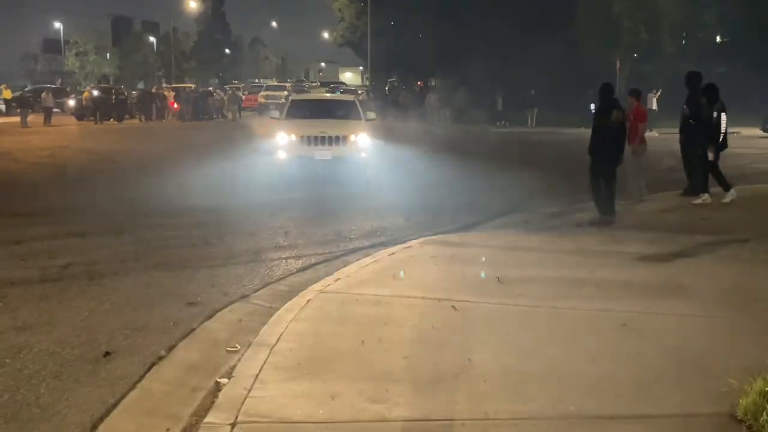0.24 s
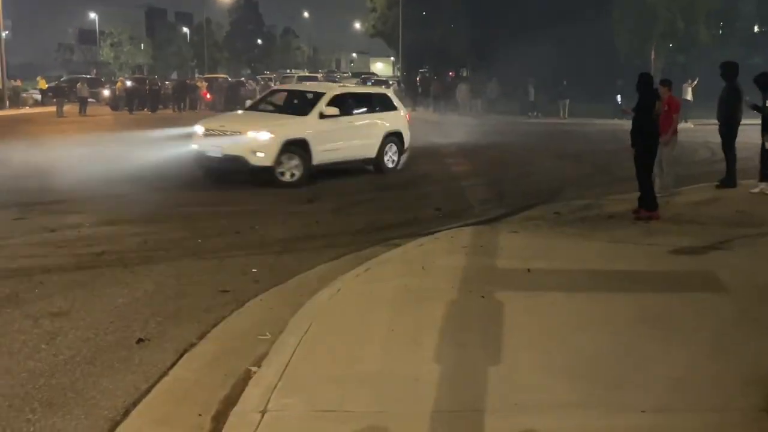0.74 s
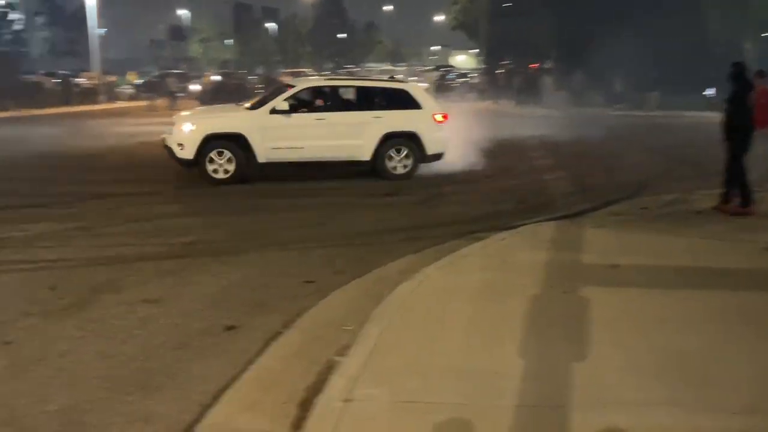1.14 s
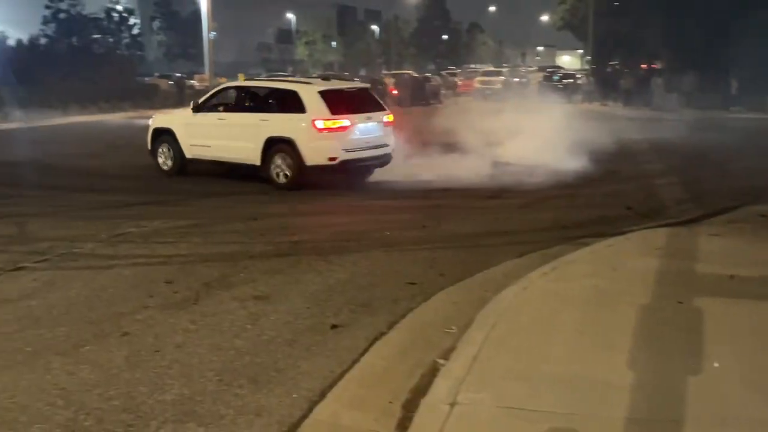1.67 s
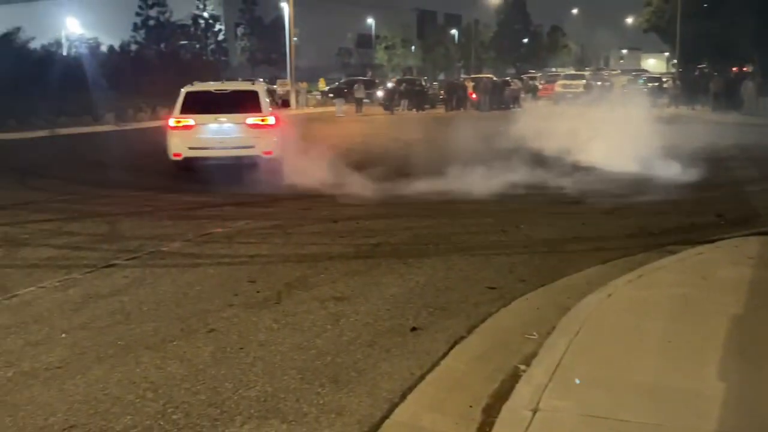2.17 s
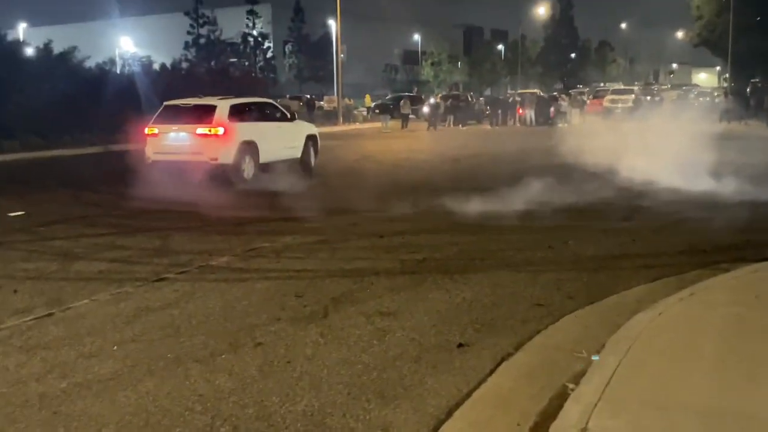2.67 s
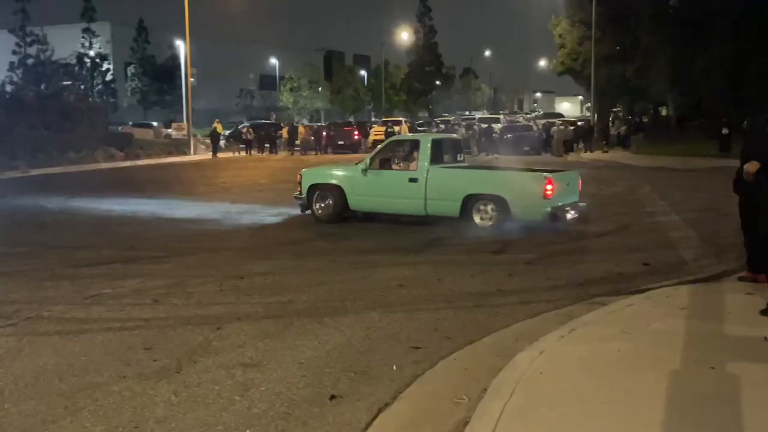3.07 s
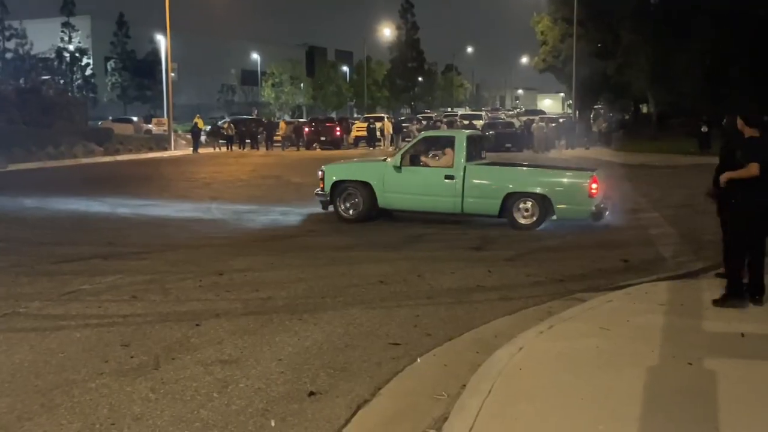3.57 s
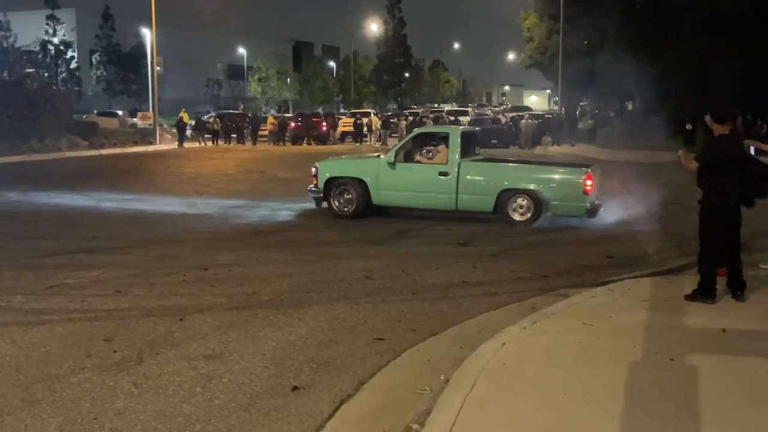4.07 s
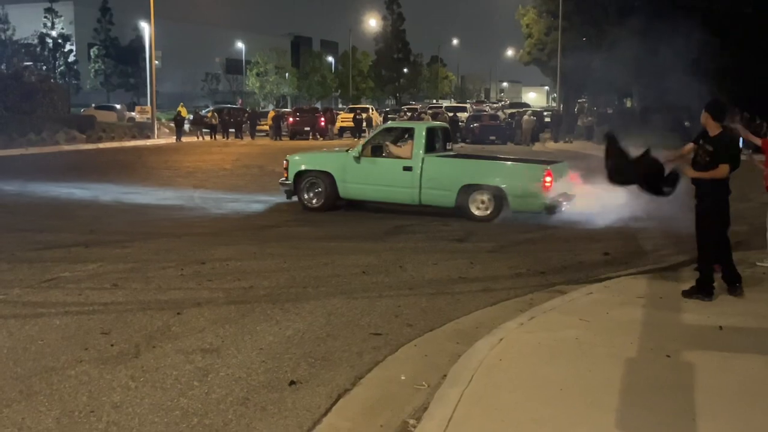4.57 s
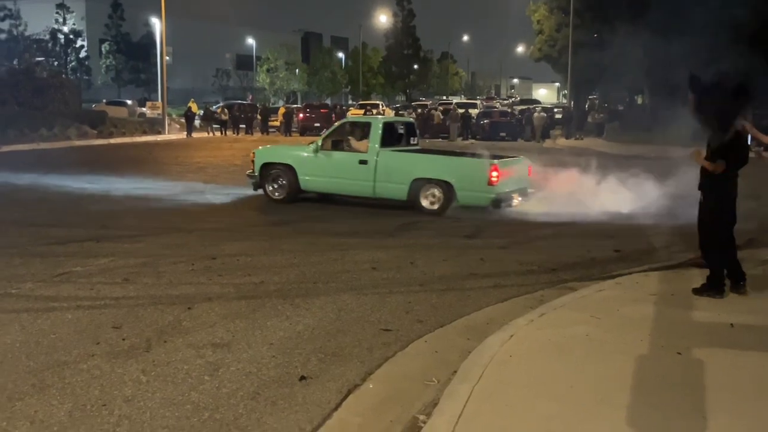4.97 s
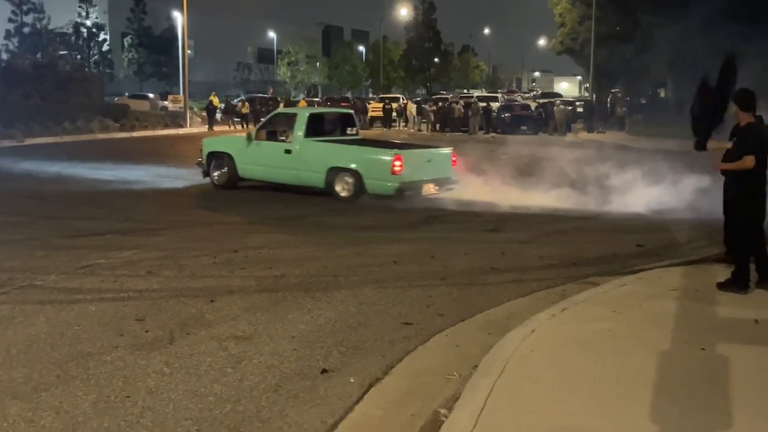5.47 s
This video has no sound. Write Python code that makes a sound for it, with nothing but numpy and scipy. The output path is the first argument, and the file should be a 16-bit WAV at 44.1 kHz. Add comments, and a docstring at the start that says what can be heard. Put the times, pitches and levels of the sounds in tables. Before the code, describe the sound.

In an open lot at night, skidding rubber shrieks and fades, then abruptly a throbbing V8 exhaust holds high revs with tyres howling.

```python
"""A wide parking lot at night, heard from a phone on the kerb, in two shots joined by a hard cut.
First an SUV swings through a donut: engine orders and dark noise under a bank of stick-slip squeals and torn rubber.
Then a V8 pickup holds high revs in a burnout: uneven exhaust orders and gas puffs throb under three howling tread modes.
Short tread squeaks, thin whistles and hissing grit ride on top; noise tails scatter the sound across the lot."""
import sys
import numpy as np
from scipy import signal
from scipy.fft import rfft, irfft
from scipy.io import wavfile
from scipy.ndimage import uniform_filter1d, map_coordinates

SR = 44100
rng = np.random.default_rng(int(sys.argv[2]) if len(sys.argv) > 2 else 0)


def put_to_file(sound):
    """Save the sound as 16-bit audio at rate SR, in the file named by the first command-line argument."""
    columns = np.atleast_2d(sound).T  # one column per channel
    safe = np.clip(columns, -1, 1)
    whole_steps = np.round(safe * 32767)
    wavfile.write(sys.argv[1], SR, whole_steps.astype(np.int16))


N = 252252
T = np.arange(N) / SR

# The SUV's sliding tyres. Each row: time in seconds, squeal pitch in Hz before a 4.5 % raise,
# level in dB before a 1 dB cut, scatter of the tread pitches as log pitch ratio.
SUV_TYRES = [(0, 1044, -33, 0.16), (.72, 953.6, -40, .15), (1.0, 955.4, -26, .14),
             (1.2, 760.4, -40.5, 0.27), (1.52, 921.5, -22.5, 0.29), (1.69, 949, -14.5, .26),
             (1.8, 996, -17.5, 0.25), (1.9, 1015, -14, .27), (1.94, 1029, -20.5, 0.26),
             (2.15, 1023, -21.5, .26), (2.45, 987.3, -27.5, 0.29), (2.475, 1003, -35, 0.26),
             (2.51, 1045, -25.5, .22), (2.64, 1137, -27, 0.25), (2.7, 1145, -34, 0.25),
             (2.73, 1175, -26.5, 0.22), (2.93, 1095, -31, 0.28), (3.09, 1070, -29.5, .27)]
# The pickup's three howling tread modes. Each row: time in seconds, low pitch in Hz, low level in dB,
# middle pitch in Hz, middle level in dB, upper pitch in Hz, upper level in dB.
PICKUP_TYRES = [(3.5, 655.8, -24.5, 889, -25.5, 1290, -30), (3.7, 665.5, -30, 875.6, -25, 1295, -32),
                (3.9, 659.6, -31, 880, -34, 1280, -36.5), (4.1, 666, -27, 870.6, -24.5, 1298, -32.5),
                (4.48, 672.7, -23.5, 860.3, -26, 1280, -32), (4.8, 699, -28, 872.3, -26, 1275, -31.5),
                (5.15, 721, -30.5, 880, -24, 1286, -30.5), (5.3, 719, -31, 902, -26.5, 1310, -33),
                (5.7, 716, -31, 951, -26.5, 1358, -33)]
# The firm note the pickup's tread settles on as it creeps off. Each row: time in seconds, pitch in Hz, level in dB.
PICKUP_NOTE = [(5.0, 870, -55), (5.1, 890, -28), (5.16, 905, -29), (5.24, 880, -40), (5.32, 868, -25),
               (5.38, 865, -34), (5.47, 890, -27), (5.51, 945, -23), (5.56, 968, -23), (5.61, 958, -24),
               (5.7, 985, -28)]
# The pickup's revs. Each row: time in seconds, engine cycles per second.
PICKUP_REVS = [(3.12, 31), (3.37, 31.5), (3.45, 28.8), (3.78, 28.85), (3.9, 29.7), (4.5, 31.45),
               (5.05, 31.55), (5.72, 29.8)]
# Exhaust lines. Each row: multiple of the engine cycle rate, relative level in dB.
SUV_ORDERS = [(3, -4.5), (4, 1), (6, -3.5), (7, -5), (9, -10.5), (10, -22)]
PICKUP_ORDERS = [(2, -12), (3, -6.5), (4, -12), (5, 0), (6, -10), (7, -17), (8, -22)]
PICKUP_BARK = [(10, 1), (11, 3), (12, 2), (13, 5), (14, 0.5), (15, 1), (16, 1), (17, 1), (18, -2)]  # higher lines that stand out of the rasp
# Short notes as the tread catches. Each row: start in seconds, length in seconds, start pitch in Hz,
# end pitch in Hz, level in dB, roughness as share of the pitch.
SQUEAKS = [(.05, .08, 1030, 1060, -35, .03), (.04, .07, 1400, 1560, -38, .04),
           (.11, .08, 1260, 1170, -37, .035), (.1, .07, 2080, 2000, -42, .025),
           (.41, .1, 1500, 1380, -39, .035), (.43, .08, 2000, 1900, -42, .03),
           (.61, .07, 2620, 2740, -44, .014), (.72, .1, 2020, 1850, -39, .018),
           (.8, .07, 1480, 1430, -36, .015), (.84, .06, 1010, 950, -32, .02),
           (.95, .11, 965, 945, -28, .016), (.95, .05, 1820, 1880, -41, .015),
           (1.0, .07, 780, 750, -33, .03), (1.24, .012, 740, 720, -23, .014),
           (1.6, .07, 2230, 2400, -35, .008), (1.65, .07, 2230, 2370, -33, .008),
           (1.67, .06, 2070, 2100, -36, .014), (1.67, .07, 870, 830, -18, .02),
           (1.74, .06, 1040, 990, -20, .014), (1.875, .045, 1050, 1010, -15, .014),
           (2.11, .09, 870, 825, -27, .02), (2.125, .04, 1800, 1880, -39, .06),
           (2.19, .15, 815, 830, -29, .02), (2.35, .12, 825, 850, -25, .014),
           (2.714, .007, 1200, 1190, -21, .014), (2.735, .05, 1170, 1230, -28, .014),
           (3.14, .17, 1205, 1240, -42, .008), (3.18, .14, 590, 630, -40, .03),
           (3.2, .07, 870, 890, -41, .015), (3.23, .07, 1470, 1510, -44, .012),
           (3.3, .1, 915, 935, -33, .014), (3.46, .06, 890, 915, -25, .014),
           (3.5, .07, 1235, 1260, -30, .012), (3.66, .11, 905, 850, -28, .016),
           (4.03, .08, 620, 665, -26, .02), (4.41, .07, 670, 640, -26, .02),
           (4.67, .07, 710, 680, -27, .02), (4.71, .08, 1220, 1280, -32, .01),
           (5.38, .05, 980, 1040, -29, .02)]
# A tyre bites into the asphalt, tearing rubber and throwing grit. Each row: peak in seconds,
# half length in seconds (where the bump is down to 1/e), scrub rise in dB, spray rise in dB.
BITES = [(0.06, 0.082, 6.5, 0), (0.247, 0.051, 2.5, -5), (0.468, 0.068, 3, -2), (0.63, 0.02, 1.5, 3),
         (0.812, 0.13, 6, 8), (1.007, 0.031, 3, 11.5), (1.62, 0.24, 9.5, 9.5), (1.705, .025, 2.5, -0.5),
         (1.913, 0.081, 7, 5.5), (2.145, 0.017, 5, -3), (2.293, 0.023, 4, -7), (2.385, 0.031, 7, -3),
         (2.894, 0.21, 3, 6.5), (3.451, 0.014, 4.5, 7.5), (3.834, 0.014, 4, 5), (3.97, 0.03, 3.5, 2),
         (4.35, 0.19, 1, 2.5)]
# Noise colours. Each row: frequency in Hz, relative density in dB.
SUV_BOOM = [(18, -78), (30, -27), (51, -14), (75, -2), (94, -9), (113, -7), (141, -8), (260, -13),
            (340, -72), (570, -120)]
SUV_RASP = [(150, -10.5), (230, -4.5), (290, -3), (335, -7.5), (410, -1.5), (500, -3), (620, 0.5),
            (760, -3.5), (1100, -6)]
PICKUP_RASP = [(140, 9), (220, -2.5), (295, -3.5), (340, -2), (400, 0), (450, -8.5), (490, -4.5),
               (560, -15), (800, -16), (1400, -8)]
SUV_SCRUB = [(450, -11), (750, -6.5), (1450, 3.5), (1730, 0.5), (2000, 2), (2300, -3), (2650, 1),
             (3000, -4.5), (3800, -8), (4450, -6), (4900, -10.5), (5600, -14), (8000, -19)]
PICKUP_SCRUB = [(490, -2.5), (600, 10.5), (900, 7.5), (1080, 3.5), (1350, -1.5), (1650, 4), (2000, -0.5),
                (2600, -3), (3200, -5), (3700, -10), (4500, -11), (5600, -14), (8000, -23)]
SPRAY = [(3400, -12), (4400, -1), (5400, 4.5), (7200, 4.5), (8700, 2.5), (10500, 1), (12000, -4),
         (13400, -17)]
# How the two microphone ports differ, and what is added to that for a vehicle's position.
# Each row: frequency in Hz, left minus right in dB, lead of the left in radians.
PORTS = [(100, 0, -.2), (400, 0, -.4), (540, 1, .7), (720, 1, -.1), (780, -2, 0), (820, -7, .5),
         (900, 0, .5), (1100, .3, .15), (1600, -3.5, -.1), (1750, -13, .2), (1820, -7, .9), (2100, 2, .6),
         (2500, 5.5, 1.3), (3200, 4.4, .9), (3600, 3, .1), (4500, .7, 0), (6000, .5, -.1), (7000, .5, -1.5),
         (9800, 0, -4.8), (10600, 0, -2 * np.pi)]
SUV_REAR = [(760, 0, 0), (900, 2.5, .3), (1080, 0, 0), (1400, -1, 1), (1560, 2, 1.8), (1660, 2, 5),
            (1800, 2, 2 * np.pi)]  # facing away
PICKUP_SIDE_ON = [(15, 0, 0), (50, 0, -1.4), (150, 0, -1.8), (350, 0, -2.4), (460, 0, -3.4),
                  (540, 1.5, -5.6), (660, 1.5, -6.2), (900, -2, -6.3), (1400, -1.5, -6.6),
                  (2100, 0, -2 * np.pi)]
PICKUP_SWUNG = [(15, 0, 0), (50, 0, -1.4), (150, 0, -1.5), (250, 1, -1.1), (350, 3, -.4), (450, 1.5, .3),
                (600, 0, 0), (900, -2, 0), (1700, -3, -.2), (2100, 0, 0)]  # tail swung round

CUT_S, RESUME_S = 3.1, 3.109
TOP_HZ = 13400

# SUV: engine cycles a second, and the share by which they wander
SUV_CYCLE_HZ, SUV_WANDER = 22.98, 0.0315
SUV_BOOM_DB, SUV_RASP_DB, SUV_SCRUB_DB, SUV_SPRAY_DB = -26, -36.5, -38.5, -52
SUV_RUMBLE_DB = -42.5  # the deepest rumble bends round the body and is never shaded
# its tail sweeps past the phone, then its body turns away and shades the boom; the grit is hidden last
TAIL_NEAREST_S, TAIL_PASS_S, TAIL_RASP_DB = 1.623, 0.63, 13.5
TURN_AWAY_S, TURN_LENGTH_S, SHADE_BOOM_DB = 1.81, 0.15, -7.5
SHADE_SPRAY_S, SHADE_SPRAY_LENGTH_S, SHADE_SPRAY_DB = 1.99, 0.064, -7.5
REAR_RASP_DB = 2  # more rasp once the tail points at the phone
DRONE_S, DRONE_LENGTH_S, DRONE_HZ, DRONE_DB = 2.76, 0.45, 417, -37  # the tailpipe drones at the phone
LIFT_OFF_S, LIFT_OFF_DB_PER_S = 2.853, -88  # the driver lets go of the throttle
# whistles against the scrub, and dB more for each dB of bite
CHIRP_DB, CHIRP_PER_BITE = -10.5, 0.091
# a close reflection grows as the SUV swings round, cancelling a rising pitch and its odd multiples
BOUNCE_S, BOUNCE_GROW_S = 1.03, 0.87
BOUNCE_FROM_HZ, BOUNCE_TO_HZ, BOUNCE_FROM_DB, BOUNCE_TO_DB = 400, 525, -16, -1.6

# pickup: it takes load, its tyres spin up, then it creeps away
LOAD_S, LOAD_LENGTH_S, SPIN_UP_S = 3.225, 0.023, 0.21
PICKUP_BOOM_DB, PICKUP_RASP_DB, PICKUP_SCRUB_DB, PICKUP_SPRAY_DB = -20, -27, -27.5, -48
GRIP_SQUEAL_DB, GRIP_GROUND_DB, GRIP_RASP_DB = -29.5, -14.5, -7  # howl, scrub and spray, rasp before the spin
CREEP_SCRUB_DB_PER_S, CREEP_SPRAY_DB_PER_S = -1.38, -1.5
# its tailpipe swings towards the phone: the rasp eases a little and the boom swells
SWING_S, SWING_LENGTH_S, SWING_RASP_DB, SWING_BOOM_DB_PER_S2 = 4.183, 0.66, -1.5, 2.5
# its pipe resonates when the third order meets it; that order is strongest with no load
PIPE_HZ, PIPE_WIDTH_HZ, PIPE_DB, OFF_PIPE_DB, UNLOADED_DB = 95.4, 3.5, 7.5, -5, 11.5
THROB_DB = 0.5  # the strongest exhaust order shakes the howl
OVERTONE_HZ, OVERTONE_DB, OVERTONE_S, OVERTONE_RISE_S = 1393, -37, 5.33, 0.1  # joins the firm note

# a tread block catches: how often, how much louder, share by which its pitch shifts; the whole tyre judders
CATCHES_PER_S, CATCH_DB, PITCH_WANDER = 40, 4.5, 0.035
JUDDERS_PER_S, JUDDER_DB = 150, 0.5


def suv():
    """The donut: engine and tyres with their close reflection, turning away, plus grit and the lot's tail."""
    away = ramp(TURN_AWAY_S, TURN_LENGTH_S)
    sound = bounce(suv_engine(away) + suv_tyres(), ramp(BOUNCE_S, BOUNCE_GROW_S))
    throw_db = bites()[1]
    spray_db = SUV_SPRAY_DB + throw_db + SHADE_SPRAY_DB * ramp(SHADE_SPRAY_S, SHADE_SPRAY_LENGTH_S)
    grit = undb(spray_db) * spray(grain_db=1.5, flutter_db=2.5)
    placed = (1 - away) * sound + away * ports(sound, SUV_REAR)
    return placed + grit + undb(-18) * lot(sound, t60=0.94, delay=0.013, side_db=2.5)


def suv_tyres():
    """Sliding rear tyres: many stick-slip pitches, torn rubber and thin whistles."""
    hz, squeal_db, spread = curves(SUV_TYRES)
    tear_db = bites()[0]
    scrub_db = SUV_SCRUB_DB + tear_db
    chirp_db = scrub_db + CHIRP_DB + CHIRP_PER_BITE * tear_db
    tyres = undb(squeal_db - 1) * squeal(hz * 1.045, spread, jitter=0.02406, flicker_db=3, octave_db=-22, count=14)
    tyres += undb(scrub_db) * scrub(SUV_SCRUB, grain_db=1.5, flutter_db=1.54)
    return tyres + undb(chirp_db) * chirps(hz=2050, spread=0.27, glide=0.06, flicker_db=8, count=9)


def suv_engine(away):
    """A muffled, unsteady engine: wandering exhaust lines in dark noise, with rasp, rumble and a tailpipe drone."""
    lifted_db = LIFT_OFF_DB_PER_S * np.maximum(T - LIFT_OFF_S, 0)
    boom_db = SUV_BOOM_DB + SHADE_BOOM_DB * away + lifted_db
    rasp_db = SUV_RASP_DB + TAIL_RASP_DB * bell(T, TAIL_NEAREST_S, TAIL_PASS_S) + REAR_RASP_DB * away
    turns = np.cumsum(SUV_CYCLE_HZ * (1 + SUV_WANDER * walk(18))) / SR
    lines = unit(sum(exhaust(turns, SUV_ORDERS, waver_db=4)))
    boom = undb(-4) * lines + undb(-5.5) * colour(noise(), SUV_BOOM)
    rumble = colour(noise(), [(32, -11), (48, -4), (62, -2.5)])
    drone = colour(noise(), [(DRONE_HZ * 0.75, -18), (DRONE_HZ, 0), (DRONE_HZ * 1.3, -22)])
    engine = undb(boom_db) * boom + undb(rasp_db) * colour(noise(), SUV_RASP)
    engine += undb(SUV_RUMBLE_DB + lifted_db) * rumble
    return engine + undb(DRONE_DB) * bell(T, DRONE_S, DRONE_LENGTH_S) * drone


def pickup():
    """The burnout: a V8 throbs through its swinging tailpipe while the spinning tyres howl and throw grit."""
    unloaded, gripping = 1 - ramp(LOAD_S, LOAD_LENGTH_S), 1 - ramp(LOAD_S, SPIN_UP_S)
    swung = ramp(SWING_S, SWING_LENGTH_S)
    turns = np.cumsum(curves(PICKUP_REVS)[0] * (1 + 0.0025 * walk(25))) / SR
    engine = pickup_engine(turns, unloaded, gripping, swung)
    tyres = pickup_tyres(turns, gripping, swung)
    sound = engine * np.clip((T[-1] - T) * 150, 0, 1) + tyres  # the engine fades in the last 7 ms
    throw_db = bites()[1]
    spray_db = PICKUP_SPRAY_DB + throw_db + GRIP_GROUND_DB * gripping + CREEP_SPRAY_DB_PER_S * (T - LOAD_S)
    grit = undb(spray_db) * spray(grain_db=1.5, flutter_db=2.5)
    placed = (1 - swung) * ports(sound, PICKUP_SIDE_ON) + swung * ports(sound, PICKUP_SWUNG)
    return placed + grit + undb(-23.5) * lot(tyres, t60=0.55, delay=0.016, side_db=0.5)


def pickup_tyres(turns, gripping, swung):
    """Spinning rear tyres: a howl, torn rubber, whistles, and a hiss as the tread turns towards the phone."""
    tear_db = bites()[0]
    scrub_db = PICKUP_SCRUB_DB + tear_db + GRIP_GROUND_DB * gripping + CREEP_SCRUB_DB_PER_S * (T - LOAD_S)
    tyres = undb(GRIP_SQUEAL_DB * gripping) * howl(turns)
    tyres += undb(scrub_db) * scrub(PICKUP_SCRUB, grain_db=0.5, flutter_db=0.6)
    tyres += undb(scrub_db - 15) * chirps(hz=2007, spread=0.3, glide=0.03, flicker_db=19)
    hiss = scrub([(3300, -11), (4300, 8), (5500, -10)], grain_db=3.5, flutter_db=1.5)
    return tyres + undb(-49.5) * swung * hiss


def pickup_engine(turns, unloaded, gripping, swung):
    """V8 exhaust: low orders boom through a resonant pipe, gas puffs rasp and high orders bark."""
    swell_db = SWING_BOOM_DB_PER_S2 * np.maximum(T - SWING_S, 0) ** 2
    boom_db = PICKUP_BOOM_DB + swell_db - 4 * (gripping - unloaded)  # the engine bogs as it takes the load
    rasp_db = PICKUP_RASP_DB + GRIP_RASP_DB * gripping + SWING_RASP_DB * swung
    bark_db = rasp_db - 5 + 0.57 * (rasp_db + 31)  # the bark rises and falls more than the rasp
    lines = exhaust(turns, PICKUP_ORDERS, waver_db=1.1, disorder=0.5)
    # the deepest order needs load; it spreads evenly all round and is kept out of the swell
    lines[0] = lines[0] * undb(-swell_db) * (1 - unloaded)
    third_hz = PICKUP_ORDERS[1][0] * curves(PICKUP_REVS)[0]
    lines[1] = lines[1] * undb(OFF_PIPE_DB + PIPE_DB * bell(third_hz, PIPE_HZ, PIPE_WIDTH_HZ) + UNLOADED_DB * unloaded)
    boom = sum(lines) / np.sqrt(uniform_filter1d(sum(lines) ** 2, size=3000))  # hold the sum at an even level
    breath = colour(noise(), [(30, -15), (48, 1), (70, 8), (110, 6), (155, 11), (240, 4)])
    boom += undb(-12 - swell_db / 2) * breath
    rasp = colour(firings(turns, scatter_db=1.5, puff=0.3) * noise(), PICKUP_RASP)
    bark = unit(sum(exhaust(turns, PICKUP_BARK, waver_db=4.5)))
    return undb(boom_db) * boom + undb(rasp_db) * rasp + undb(bark_db) * bark


def squeal(hz, spread, jitter, flicker_db, octave_db, count=9):
    """Tread blocks stick and slip, each near its own pitch; they take turns to catch and blend into one rough howl."""
    out, power = 0, 0
    for place in np.linspace(-1, 1, count):
        pitch = hz * np.exp(spread * place + PITCH_WANDER * walk(CATCHES_PER_S) + jitter * walk(260))
        phase = 2 * np.pi * (np.cumsum(pitch) / SR + rng.random())
        grip = undb(CATCH_DB * np.tanh(walk(CATCHES_PER_S)) - 4 * place ** 2)
        tone = np.sin(phase) + undb(octave_db) * np.sin(2 * phase)
        out = out + grip * undb(flicker_db * walk(90)) * tone
        power = power + grip ** 2
    return unit(out / np.sqrt(power) * undb(JUDDER_DB * walk(JUDDERS_PER_S)))


def howl(turns):
    """The pickup's tread: three rough modes shaken by the engine, plus a firm note and the upper mode's overtone."""
    low_hz, low_db, middle_hz, middle_db, upper_hz, upper_db = curves(PICKUP_TYRES)
    modes = undb(low_db) * squeal(low_hz, 0.11, jitter=0.02996, flicker_db=3.5, octave_db=-28, count=8)
    modes += undb(middle_db) * squeal(middle_hz, 0.105, jitter=0.025, flicker_db=1.5, octave_db=-30, count=8)
    modes += undb(upper_db) * squeal(upper_hz, 0.082, jitter=0.025, flicker_db=3.5, octave_db=-17.5, count=7)
    throb = undb(THROB_DB * np.sin(2 * np.pi * PICKUP_ORDERS[3][0] * turns))
    note_hz, note_db = curves(PICKUP_NOTE)
    firm = undb(note_db) * note(note_hz, jitter=0.008, flutter_db=1.5)
    overtone = ramp(OVERTONE_S, OVERTONE_RISE_S) * note(OVERTONE_HZ, jitter=0.009, flutter_db=2)
    return modes * throb + firm + undb(OVERTONE_DB) * overtone


def note(hz, jitter, flutter_db):
    """The whole tread slips in step: one slightly unsteady tone; rms 1."""
    phase = 2 * np.pi * np.cumsum(hz * (1 + jitter * walk(120))) / SR
    return unit(np.sin(phase) * undb(flutter_db * walk(90)))


def exhaust(turns, orders, waver_db, disorder=1):
    """Uneven firings sound as lines on multiples of the engine cycle; little disorder joins them in one throb a cycle."""
    lines = []
    for k, db in orders:
        phase = 2 * np.pi * (round(k) * turns + disorder * rng.random())
        lines.append(undb(db + waver_db * walk(15)) * np.sin(phase))
    return lines


def firings(turns, scatter_db, puff):
    """Gas leaves in eight puffs a cycle; the cylinders differ, and so does every firing."""
    count = (8 * turns).astype(int)
    cylinder_db = np.array([-1, -14, -2.5, 4.5, -13, 0.5, -2, -20])[count % 8]
    size = undb(cylinder_db + scatter_db * rng.standard_normal(4096)[count])
    return size * np.exp(-(8 * turns % 1) / puff)


def scrub(table, grain_db, flutter_db):
    """Rubber tears over the stones in dense grains that come in flurries."""
    grains = noise() * undb(grain_db * walk(1200))
    return colour(grains, table) * undb(flutter_db * walk(35))


def chirps(hz, spread, glide, flicker_db, count=6):
    """Tread edges catch for a moment and whistle in thin gliding strands."""
    out = 0
    for place in np.linspace(-1, 1, count):
        pitch = hz * np.exp(spread * place + glide * walk(16))
        strand = np.sin(2 * np.pi * np.cumsum(pitch) / SR)
        out = out + undb(flicker_db * np.tanh(walk(18))) * strand
    return unit(out)


def squeaks(flutter_db):
    """The tread catches in short notes, clear or rough, that swell, glide and let go."""
    out = np.zeros(N)
    for start, length, from_hz, to_hz, db, rough in SQUEAKS:
        along = ramp(start, length)
        swell = 2 * np.sqrt(along * (1 - along))
        out += undb(db) * swell * note(from_hz + (to_hz - from_hz) * along, rough, flutter_db)
    return out


def bites():
    """How far the bites lift the scrub and the spray, in dB."""
    return sum(np.outer([scrub_db, spray_db], bell(T, s, width)) for s, width, scrub_db, spray_db in BITES)


def spray(grain_db, flutter_db):
    """Grit hisses over a wide patch of asphalt, so the ports hear it partly apart, except at the very top."""
    side = colour(noise(), [(5000, -6), (7000, 0), (9800, -3), (11000, -30)])
    return scrub(SPRAY, grain_db, flutter_db) + undb(-10) * side * np.array([[1], [-1]])


def bounce(x, swung):
    """A dull copy arrives half a period of the cancelled pitch later."""
    notch_hz = BOUNCE_FROM_HZ + (BOUNCE_TO_HZ - BOUNCE_FROM_HZ) * swung
    db = BOUNCE_FROM_DB + (BOUNCE_TO_DB - BOUNCE_FROM_DB) * swung
    dull = signal.sosfiltfilt(signal.butter(1, 1700, fs=SR, output="sos"), x)
    late = map_coordinates(dull, [np.arange(N) - SR / (2 * notch_hz)], order=1)
    return (x + undb(db) * late) / np.sqrt(1 + undb(2 * db))


def lot(x, t60, delay, side_db):
    """Parked cars and far walls scatter a dull tail; only its treble differs between the close ports."""
    tail = rng.standard_normal((2, N)) * undb(-60 * T / t60) * np.clip(T / delay - 1, 0, 1)
    mid = colour(tail[0], [(200, -3), (500, -14), (900, -2.5), (2500, -2.5), (8000, -7)])
    side = undb(side_db) * colour(tail[1], [(900, 8), (1800, 2.5), (3300, 15.5), (8000, -20)])
    return signal.fftconvolve(x[None], np.array([mid + side, mid - side]) / np.sqrt(N), axes=1)[:, :N]


def ports(x, table):
    """Give left and right their level and phase differences."""
    db, lead = spectra(table)
    gains = np.array([undb(db / 2), undb(-db / 2) * np.exp(-1j * lead)])
    gains = gains / np.sqrt((undb(db) + undb(-db)) / 2)  # keep the power of the pair
    return irfft(rfft(x) * gains, N)


def colour(x, table):
    """Filter by a (Hz, dB) spectrum that falls 40 dB in the octave beyond each end; rms 1."""
    rows = [(table[0][0] / 2, table[0][1] - 40), *table, (table[-1][0] * 2, table[-1][1] - 40)]
    return unit(irfft(rfft(x) * undb(spectra(rows)[0]), N))


def noise():
    """White noise."""
    return rng.standard_normal(N)


def walk(rate):
    """Smooth chance that changes about rate times a second; rms 1."""
    k = max(int(SR / rate), 2)
    knots = rng.standard_normal(8192)
    return unit(uniform_filter1d(np.interp(T * rate, np.arange(len(knots)), knots), k // 2))


def ramp(start, length):
    """From 0 to 1 over length seconds."""
    return np.clip((T - start) / length, 0, 1)


def bell(x, centre, width):
    """A smooth bump of height 1."""
    return np.exp(-((x - centre) / width) ** 2)


def curves(table):
    """Each column of a (s, ..) table, sample by sample."""
    s, *columns = np.transpose(table)
    return [np.interp(T, s, c) for c in columns]


def spectra(table):
    """Each column of a (Hz, ..) table, bin by bin on a log axis."""
    hz, *columns = np.transpose(table)
    bins = np.log(np.arange(N // 2 + 1) * SR / N + 1)
    return [np.interp(bins, np.log(hz), c) for c in columns]


def undb(db):
    """Decibels to gain."""
    return 10 ** (np.asarray(db) / 20)


def unit(x):
    """Scale to rms 1."""
    return x / np.sqrt(np.mean(x ** 2))


def scene():
    """Two shots with an instant of silence at the cut."""
    first = np.clip((CUT_S - T) * 1000, 0, 1)  # closes in 1 ms
    second = np.clip((T - RESUME_S) * 500, 0, 1)  # opens in 2 ms
    return ports(first * suv() + second * pickup() + squeaks(flutter_db=3), PORTS)


def record(dry):
    """The phone drops the deepest bass and cuts the top."""
    thinned = signal.sosfilt(signal.butter(2, 30, "high", fs=SR, output="sos"), dry)
    return signal.sosfilt(signal.ellip(8, 0.2, 70, TOP_HZ, fs=SR, output="sos"), thinned)


dry = scene()
out = record(dry)
put_to_file(out)
```